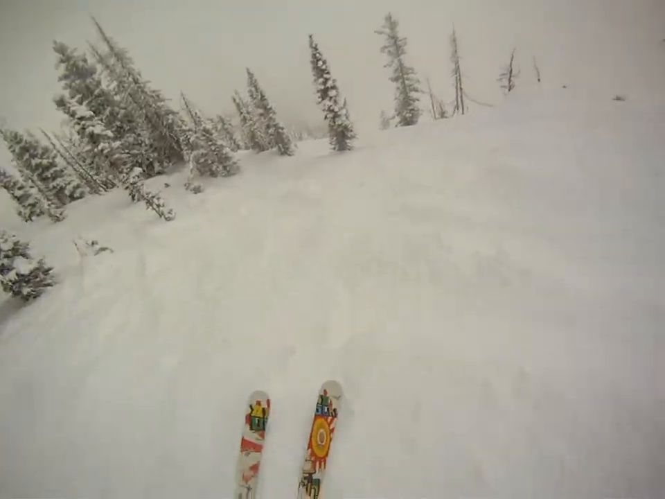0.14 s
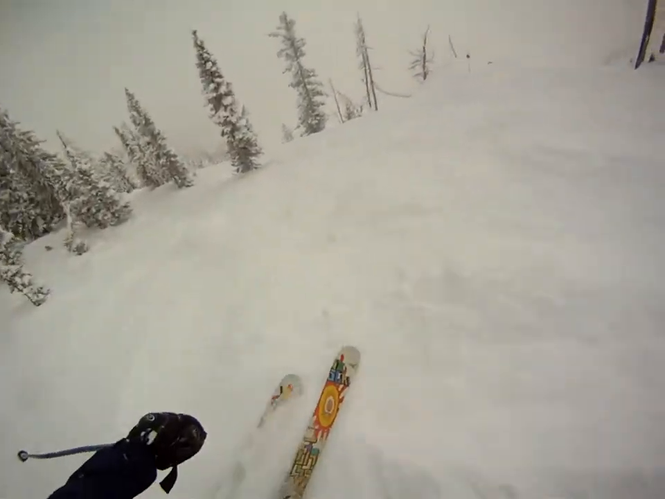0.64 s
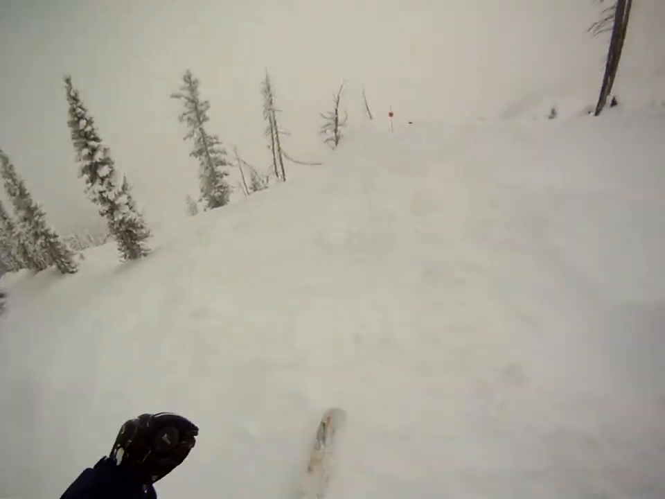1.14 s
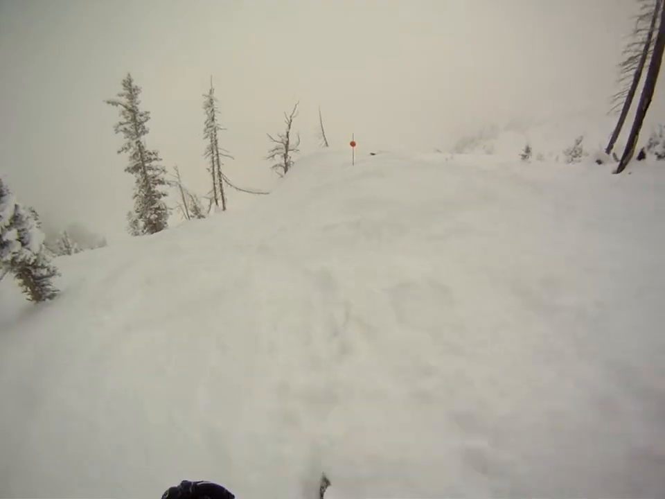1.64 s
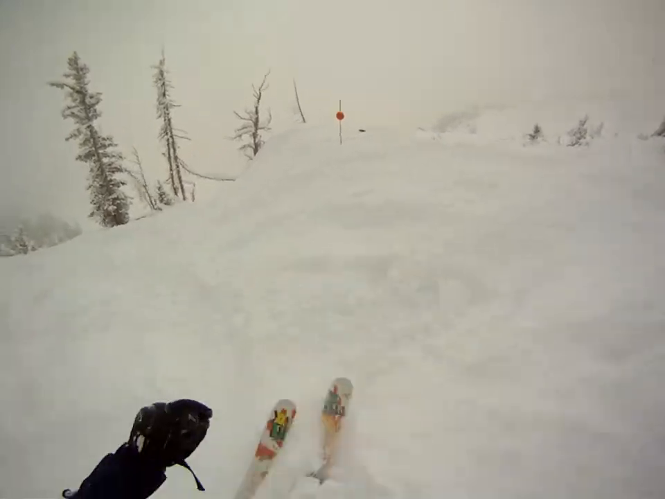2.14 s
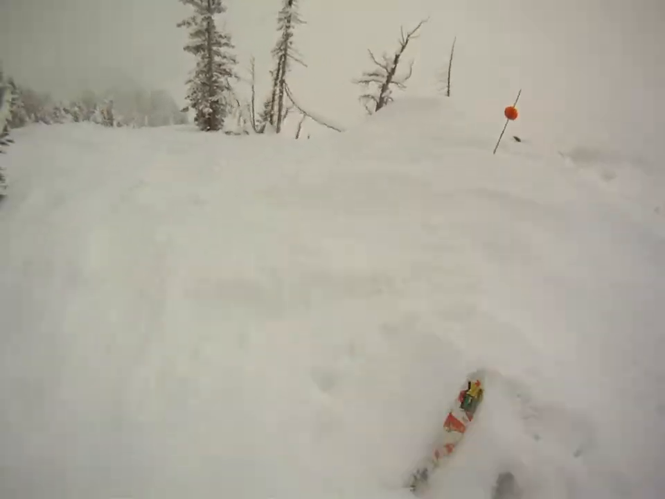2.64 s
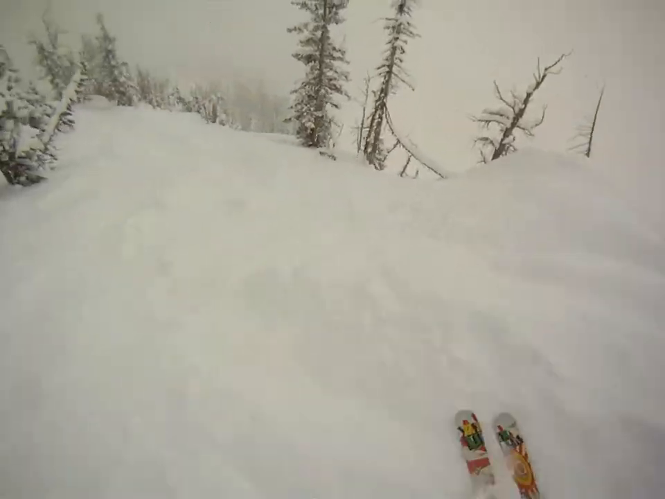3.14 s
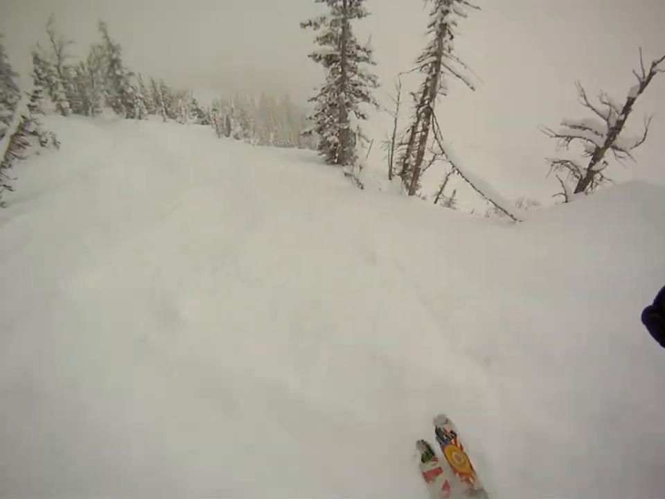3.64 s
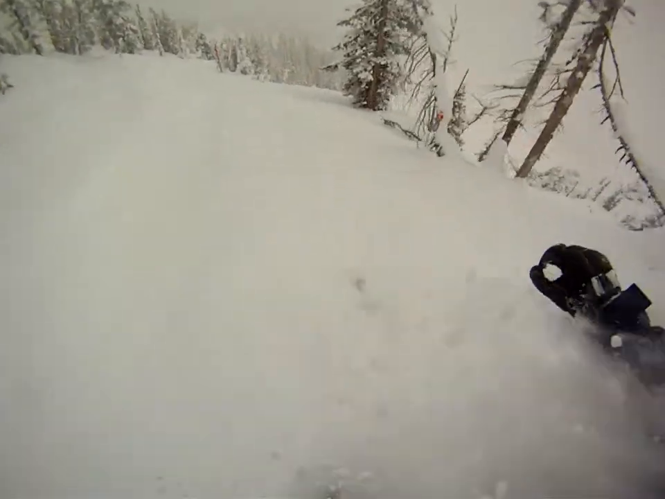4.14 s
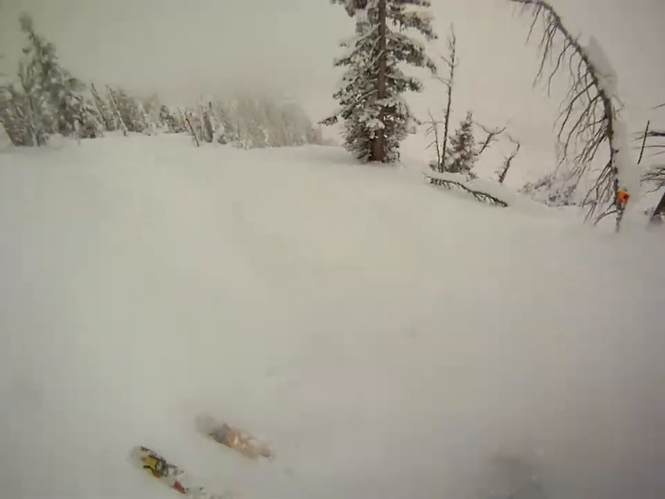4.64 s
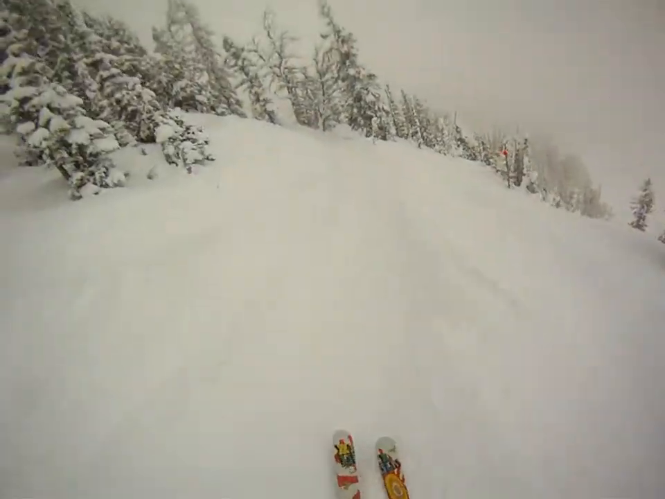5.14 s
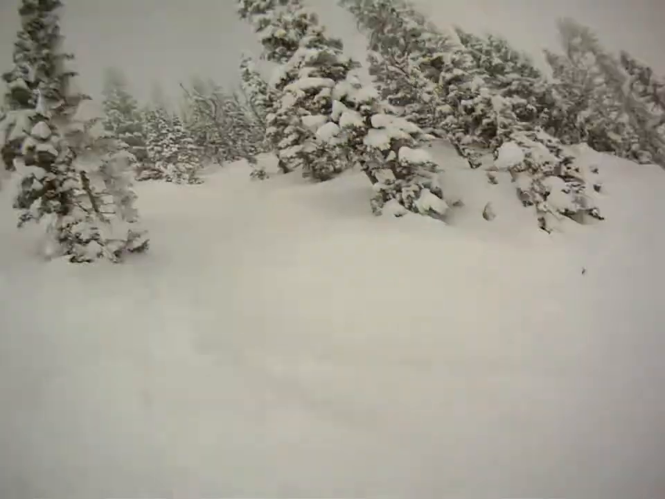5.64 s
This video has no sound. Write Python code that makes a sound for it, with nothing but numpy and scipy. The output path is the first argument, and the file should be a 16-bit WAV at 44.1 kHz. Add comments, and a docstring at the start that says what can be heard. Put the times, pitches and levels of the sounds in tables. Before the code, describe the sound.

A skier carves deep powder, heard close through a sealed plastic camera case on the helmet. Grainy hiss starts quietly and rings the shell in a nasal midrange, with faint hum, soft air rush and low mount shake following it. From 0.3 to 1.2 s taps and small jolts cluster, with a strong spray and dull thump near 0.55 s. Gentler swishes pass at 1.2-1.5 s, then soft taps around 2.0 s and sprays at 2.1 and 2.6-2.8 s. A short swish at 3.1 s leads to a hard knock at 3.26 s; another comes at 3.95 s as the swish swells, both with low wind gusts. A low thump and crisp spray follow around 4.5 s, then light ticks to 5.3 s. At 5.6 s a loud, sustained spray bursts out with three rapid knocks, fading near 5.9 s. Dry, outdoors, no echo; the treble is coarse and slightly metallic.

```python
"""A skier turns through deep powder, heard from a sealed camera case on the helmet.
Snow swishes from the start: hiss and grains ring the case, with flurries of taps and jolts in the first second.
A few softer taps follow; past three seconds two hard knocks ring the case's resonances as wind gusts rumble.
Light taps lead to a last spray and a burst of knocks; the mount shakes at its low resonances throughout.
The converter holds each coarse sample, which mirrors the spectrum upward."""
import sys
import numpy as np
from scipy import signal
from scipy.io import wavfile
from scipy.ndimage import uniform_filter1d

SR = 44100
rng = np.random.default_rng(int(sys.argv[2]) if len(sys.argv) > 2 else 0)


def gain_from_decibels(decibels):
    """Convert decibel values to linear amplitude factors."""
    exponent = np.asarray(decibels, float) / 20
    return 10 ** exponent


def wrap_up_sound(samples):
    """Save the sound to the file named by the first command line argument, as 16-bit audio."""
    columns = np.atleast_2d(samples).T
    # keep every value between -1 and 1, then stretch to whole-number steps
    tamed = np.clip(columns, -1, 1)
    steps = np.round(tamed * 32767).astype(np.int16)
    wavfile.write(sys.argv[1], SR, steps)


N = 254016

# lower and upper resonances of the case: centre_hz, width_hz, gain_db
CASE_LOW_MODES = [(1352, 267, -2), (1776, 314, 6.5), (2120, 281, 4.5)]
CASE_HIGH_MODES = [(2780, 810, -4), (3439, 417, 2), (5080, 634, -11)]
# resonances of the camera mount: centre_hz, width_hz, gain_db
MOUNT_MODES = [(112, 17, -1), (208, 81, -24)]


def level(x, rms_db):
    """Scale to an rms level."""
    return x * gain_from_decibels(rms_db) / np.sqrt(np.mean(x ** 2))


def curve(table):
    """Second column of a table over its first (seconds), interpolated at the sample rate."""
    time_s, values = np.transpose(table)
    return np.interp(np.arange(N) / SR, time_s, values)


def smooth_over(x, window_s):
    """Centred moving average."""
    return uniform_filter1d(x, int(window_s * SR))


def bandpass_noise(low_hz, high_hz):
    """White noise through a second-order Butterworth band-pass."""
    band = signal.butter(2, [low_hz, high_hz], "band", fs=SR, output="sos")
    return signal.sosfilt(band, rng.standard_normal(N))


def ring(x, modes):
    """Sum of resonances; neighbours in opposite phase add up between their peaks."""
    total = 0
    for k, (hz, width_hz, gain_db) in enumerate(modes):
        b, a = signal.iirpeak(hz, hz / width_hz, SR)
        total = total + (-1) ** k * gain_from_decibels(gain_db) * signal.lfilter(b, a, x)
    return total


def walk(rate_hz):
    """Random levels held for 1 / rate_hz and slewed twice; spread near 1."""
    hold = int(SR / rate_hz)
    steps = np.repeat(rng.standard_normal(N // hold + 1), hold)
    slewed = uniform_filter1d(uniform_filter1d(steps, hold), hold)
    return 4 / 3 * slewed[:N]


def skis():
    """Sliding snow rings the case: a dull body, crisp hiss with ticking crystals, and the hum of the shell."""
    # crispness of the snow: time_s, hiss_over_body_db
    crispness = [(0, -4.5), (1.3, -4), (1.6, -5), (2.2, -5), (2.8, -1.5), (3.3, -2), (3.6, -6.5),
                 (3.95, -1.5), (4.2, -4.5), (4.6, 2), (4.9, -7.5), (5.65, -4), (5.76, -3)]
    # lowest resonances of the case, its shell: centre_hz, width_hz, gain_db
    shell_modes = [(728, 45, -4), (937, 40, 0)]
    body_db = swish_level_db()
    hiss_db = body_db + curve(crispness)
    flutter_db = 0.73 * walk(55) + 0.95 * walk(22.08)  # the snow gives way

    snow = snow_grains(400, 5.6, -7.0)
    dull = level(ring(snow, CASE_LOW_MODES), 0) * gain_from_decibels(body_db + 0.43 * walk(30))
    ticking = snow + snow_grains(250, 6.7, -2.2)
    crisp = level(ring(ticking, CASE_HIGH_MODES), 0) * gain_from_decibels(hiss_db + 1.24 * walk(30))
    # the closed case keeps out the low end of the swish
    thin = signal.butter(2, 950, "high", fs=SR, output="sos")
    swish = gain_from_decibels(flutter_db) * signal.sosfilt(thin, dull + crisp)

    # the shell's own hum follows the swish more lazily and swells less
    hum_db = 0.97 * smooth_over(body_db, .06) + 2.0 * walk(13)
    hum = level(ring(rng.standard_normal(N), shell_modes), -19.0) * gain_from_decibels(hum_db)
    return swish + hum


def swish_level_db():
    """Glide plus sprays in power: an edge bites, the spray rises, slides to its end level and is cut off."""
    # steady glide of the skis: time_s, level_db
    glide = [(0, -54), (.17, -44), (.26, -48.5), (.33, -44.5), (.5, -43), (.8, -49), (1.09, -51.5),
             (1.55, -52), (1.87, -52.5), (2.45, -46), (2.9, -54.5), (3.1, -52), (3.32, -53.5), (3.5, -51),
             (3.72, -43.5), (3.93, -37), (4.02, -41.5), (4.25, -46.5), (4.45, -43.5), (4.52, -48),
             (4.85, -46.5), (5.02, -44), (5.15, -46), (5.5, -43), (5.58, -46)]
    # an edge bites and throws powder: start_s, length_s (until the fade), start_db (after the rise), end_db
    sprays = [(0.542, 0.069, -32.5, -41.5), (0.594, 0.082, -48, -42.5), (1.152, 0.11, -50, -51),
              (1.293, 0.07, -43, -46), (1.38, 0.098, -47, -46.5), (1.915, 0.08, -46.5, -45),
              (2.067, 0.13, -43.5, -44), (2.194, .1, -47.5, -48), (2.551, 0.17, -42, -47.5),
              (2.71, .09, -42, -39.5), (3.11, 0.089, -45.5, -40.5), (3.238, 0.041, -38, -43),
              (3.326, 0.13, -52, -52.5), (4.539, .13, -42, -41), (5.596, 0.27, -33, -31.5)]
    attack_s, release_s = .022, .035
    t = np.arange(N) / SR
    power = gain_from_decibels(curve(glide)) ** 2
    for start_s, length_s, start_db, end_db in sprays:
        end_s = start_s + length_s
        times_s = [start_s, start_s + attack_s, end_s, end_s + release_s]
        power = power + np.interp(t, times_s, [0, gain_from_decibels(start_db), gain_from_decibels(end_db), 0]) ** 2
    return 10 * np.log10(power)


def snow_grains(grains_per_s, spread_db, grain_rms_db):
    """Hiss of sliding crystals plus scattered grains of very uneven size."""
    hit, size, sign = rng.random((N, 3)).T
    size_db = np.minimum(-spread_db * np.log(size + 1e-9), 17)
    grains = (hit < grains_per_s / SR) * np.sign(sign - .5) * gain_from_decibels(size_db)
    return rng.standard_normal(N) + level(grains, grain_rms_db)  # hiss rms is 0 dB


def taps():
    """A short rough contact rings the case and shoves it a little; soft lumps press longer."""
    # snow lumps and strap taps on the shell:
    # start_s, low_peak_db, tilt_db (per step up the case's resonances), contact_ms
    contacts = [(0.322, -23, -7.5, 1.1), (0.498, -28.5, -5, 3.5), (0.5422, -26.5, -2.5, 0.37),
                (0.5664, -18, -6.5, 9.6), (0.6544, -26.5, 1, 1.9), (0.664, -42, 6, 0.86),
                (0.7143, -26.5, -4, 2.2), (0.759, -29.5, -6.5, 1.57), (0.9686, -44, 4, 1),
                (1.0007, -30, -2.5, 1.8), (1.072, -40, -0.5, 2.5), (1.104, -37.5, 0.5, 2.9),
                (1.1723, -32.5, -3, 4.6), (1.227, -33.5, -3.5, 3.5), (1.9894, -34, -0.5, 1.8),
                (2.022, -24.5, -5, 2.5), (2.0446, -30, -6.5, 3.1), (2.099, -40, 4.5, 1.7),
                (2.276, -30, -6, 1.4), (2.5888, -39, 2, 1.2), (3.053, -32.5, 2, 2.5),
                (3.2623, -8, -1, 1.67), (3.9474, -8, -0.7, 1.3), (4.3191, -50, 11, 2.3),
                (4.42, -37, 0.7, 1.2), (4.7682, -34.5, -1.5, 3.5), (4.7921, -38, 2.5, 1.9),
                (5.158, -49, 9.5, 1.25), (5.249, -42, 4.5, 1.05), (5.29, -30.5, -5.8, 3.9),
                (5.3317, -36.5, 1, 1.6), (5.6025, -11.5, -15, 2.1), (5.6139, -13, 2, 0.88),
                (5.6426, -14.5, -24, 3.7)]
    size = 2048
    out = np.zeros(N + size)
    light = signal.butter(2, 1200, "high", fs=SR, output="sos")
    shove = np.r_[np.hanning(int(.0012 * SR)), np.zeros(size)][:size]
    mode_groups = CASE_LOW_MODES, CASE_HIGH_MODES[:2], CASE_HIGH_MODES[2:]
    for start_s, low_peak_db, tilt_db, contact_ms in contacts:
        peaks_db = low_peak_db + tilt_db * np.array([0, 1.1, 1.8]) + [0, -.8, -1.5]
        t = np.arange(size) / SR / (contact_ms / 4000)  # in quarters of the contact
        rub = t * np.exp(-t) * rng.standard_normal(size)
        snap = np.arange(size) == np.argmax(t > .6)  # the instant of hardest contact
        push = signal.sosfilt(light, rub + 3.26 / contact_ms * snap)
        sound = gain_from_decibels(min(peaks_db[:2]) - 10.5) * shove
        for modes, peak_db in zip(mode_groups, peaks_db):
            rung = ring(push, modes)
            sound = sound + gain_from_decibels(peak_db) * rung / np.abs(rung).max()
        start = int(start_s * SR)
        out[start:start + size] += sound
    return out[:N]


def jolts():
    """Each landing is a push of a few milliseconds on the mount."""
    # the skis land or bottom out: start_s, peak_db
    landings = [(0.568, -25), (.25, -40.5), (0.462, -34.5), (1.204, -38.5), (1.429, -39), (2.185, -34.5),
                (2.599, -35), (2.78, -39), (3.418, -40), (4.476, -29.5), (4.621, -34), (4.862, -36.5)]
    hits = np.zeros(N)
    for start_s, peak_db in landings:
        hits[int(start_s * SR)] = gain_from_decibels(peak_db)
    push = np.hanning(int(0.0047 * SR))
    thump = ring(np.r_[push, np.zeros(SR // 4)], MOUNT_MODES)
    return signal.fftconvolve(hits, thump / np.abs(thump).max())[:N]


def shake_level_db():
    """The mount shakes with the smoothed swish, by less than a dB per dB."""
    reference_swish_db, shake_at_reference_db, slope_db_per_db = -45.5, -50.5, 0.84
    swish_db = smooth_over(swish_level_db(), 0.093)
    return shake_at_reference_db + slope_db_per_db * (swish_db - reference_swish_db)


def mount_shake(shake_db):
    """Independent noise rings each mount resonance, with some unrest of its own."""
    rung = sum(ring(rng.standard_normal(N), [mode]) for mode in MOUNT_MODES)
    return level(rung, 0) * gain_from_decibels(shake_db + 2.5 * walk(9))


def wind_buffet():
    """Gusts buffet the shell at 6-33 Hz, below the mount's resonances."""
    return level(bandpass_noise(6, 33), 0) * gain_from_decibels(wind_level_db() + 0.76 * walk(13))


def wind_level_db():
    """Each gust swells and fades as a bell in power over the steady wind."""
    # gusts: peak_s, peak_db, length_s (between the points at 1/e of the power)
    gusts = [(0.02, -47.5, 0.1), (0.612, -46, 0.47), (1.506, -65, .2), (2.38, -48, 0.23),
             (3.215, -37.5, 0.16), (3.92, -39, 0.17), (4.19, -47.5, 0.35), (4.604, -50.5, 0.5),
             (5.7, -48.5, 0.39)]
    steady_db = -57.5
    t = np.arange(N) / SR
    power = gain_from_decibels(2 * steady_db)
    for peak_s, peak_db, length_s in gusts:
        power = power + gain_from_decibels(2 * peak_db) * np.exp(-(2 * (t - peak_s) / length_s) ** 2)
    return 10 * np.log10(power)


def air_rush(shake_db):
    """Air streams past as a soft band of noise that follows the shake weakly."""
    rush_db = 0.31 * smooth_over(shake_db, .3) + 1.2 * walk(9)
    return level(bandpass_noise(250, 1000), -50.5) * gain_from_decibels(rush_db)


def scene():
    """Everything reaches one microphone through the case."""
    shake_db = shake_level_db()
    helmet = mount_shake(shake_db) + wind_buffet() + air_rush(shake_db)
    return (skis() + taps() + jolts() + helmet)[None]


def roll_off(x):
    """The treble ends steeply here."""
    return signal.sosfilt(signal.butter(12, 16480, fs=SR, output="sos"), x)


def record(dry):
    """The converter samples at 12 kHz and holds each value, so the spectrum is mirrored above 6 kHz."""
    smooth = signal.sosfilt(signal.butter(12, 5550, fs=SR, output="sos"), dry)
    coarse = signal.resample_poly(smooth, 160, 147, axis=1)[:, ::4]  # 48 kHz, every fourth sample
    held = signal.resample_poly(np.repeat(coarse, 4, axis=1), 147, 160, axis=1)[:, :N]
    edge = signal.sosfilt(signal.ellip(10, .3, 30, 15270, fs=SR, output="sos"), held)
    mix = signal.sosfilt(signal.butter(12, 16000, fs=SR, output="sos"), edge)
    return roll_off(mix)


dry = scene()
out = record(dry)
wrap_up_sound(out)
```